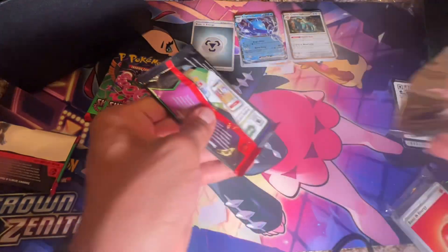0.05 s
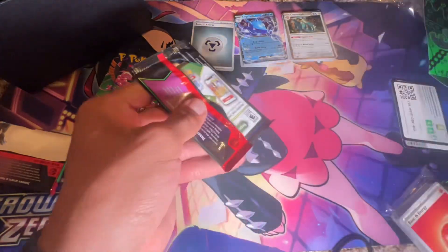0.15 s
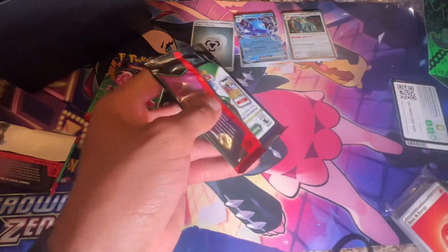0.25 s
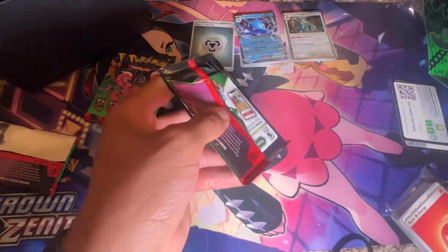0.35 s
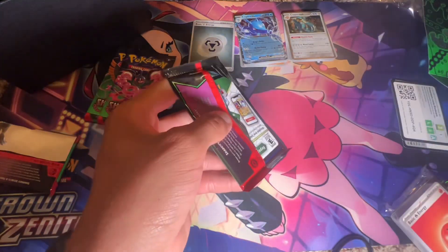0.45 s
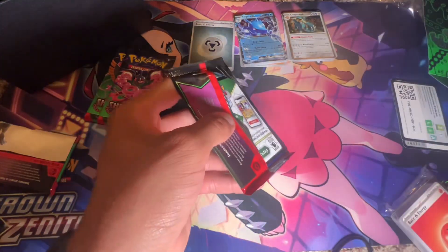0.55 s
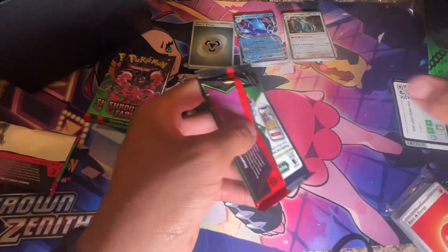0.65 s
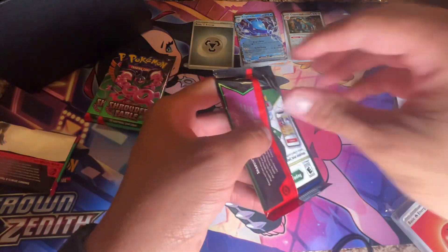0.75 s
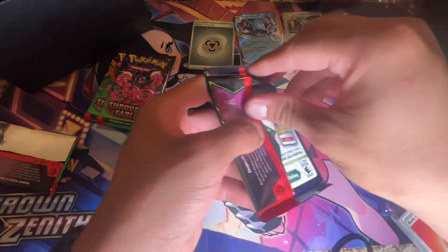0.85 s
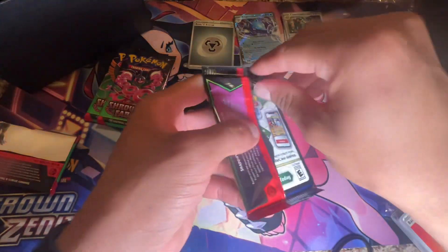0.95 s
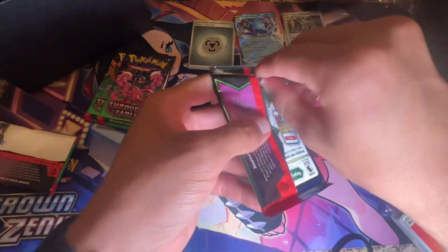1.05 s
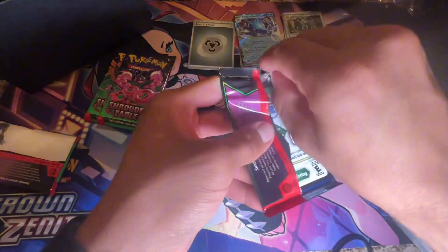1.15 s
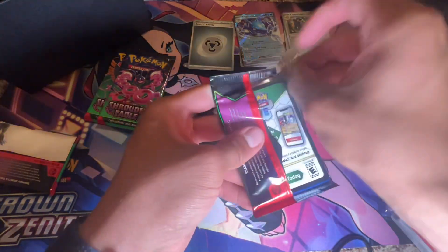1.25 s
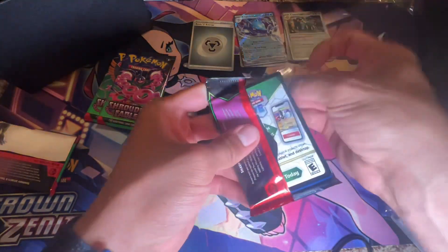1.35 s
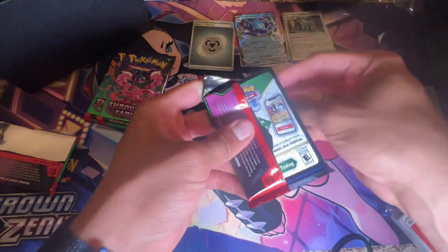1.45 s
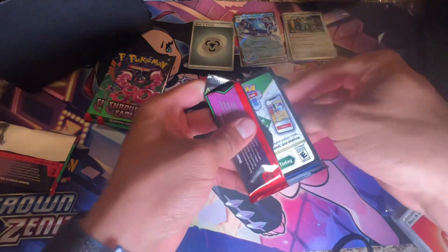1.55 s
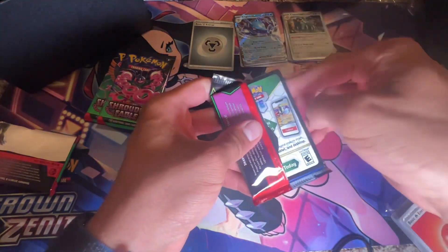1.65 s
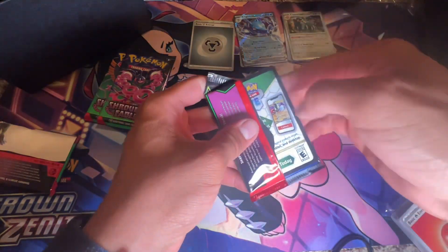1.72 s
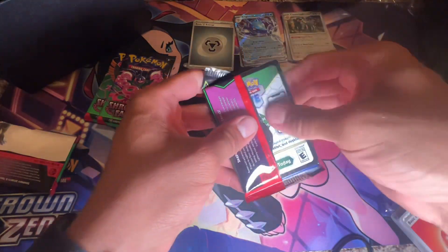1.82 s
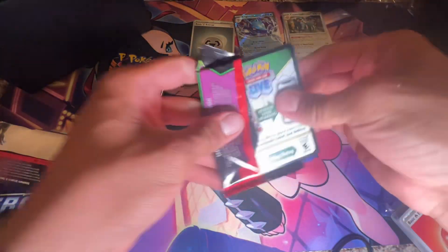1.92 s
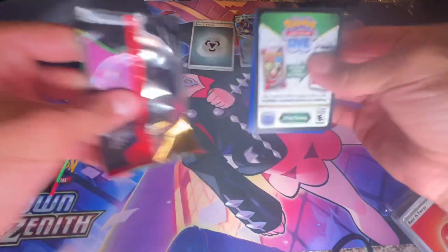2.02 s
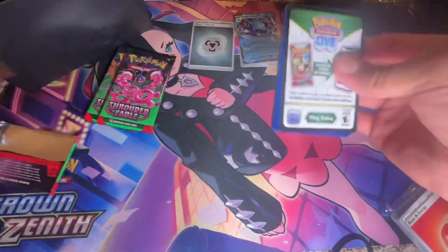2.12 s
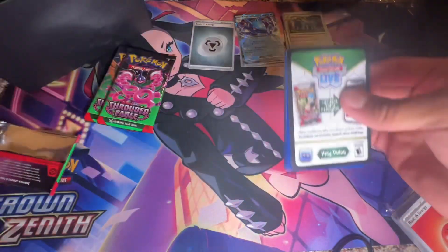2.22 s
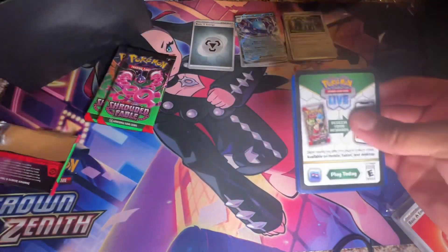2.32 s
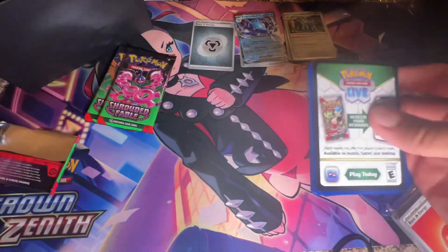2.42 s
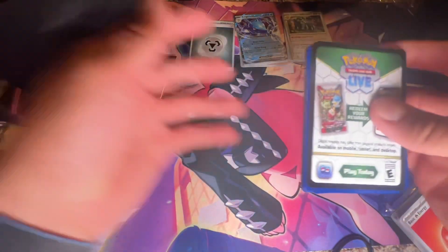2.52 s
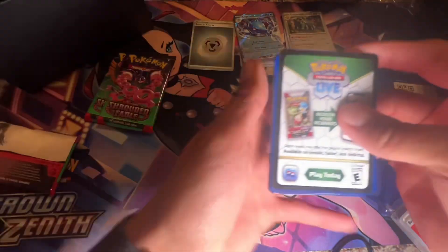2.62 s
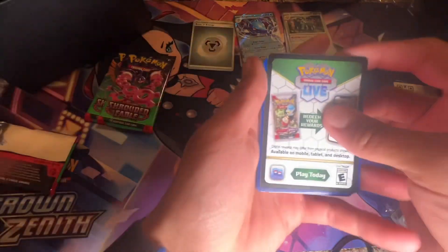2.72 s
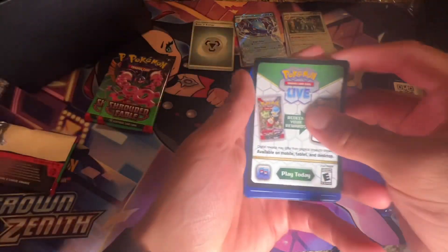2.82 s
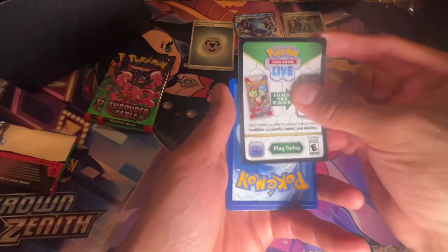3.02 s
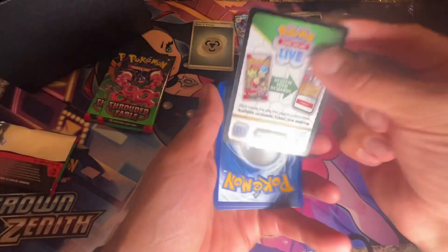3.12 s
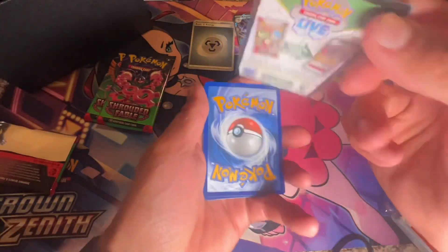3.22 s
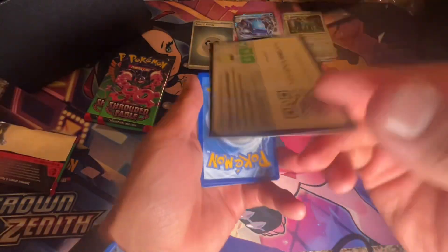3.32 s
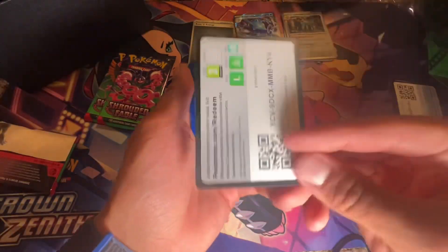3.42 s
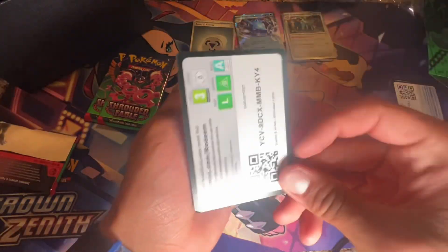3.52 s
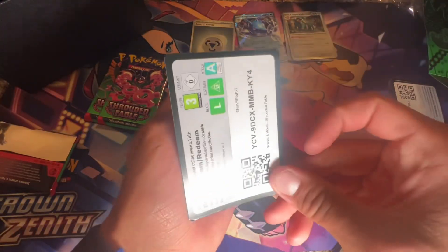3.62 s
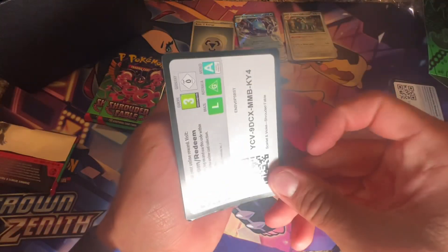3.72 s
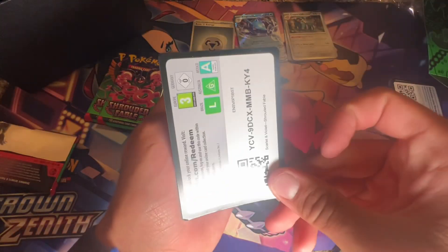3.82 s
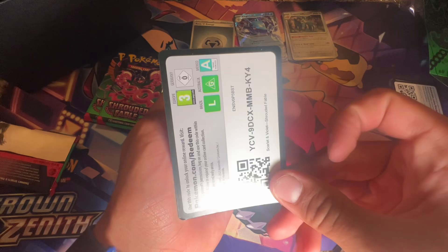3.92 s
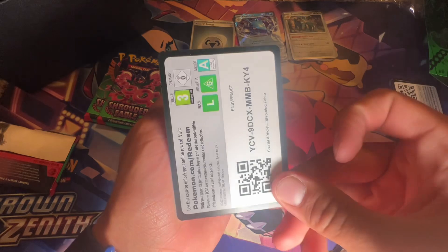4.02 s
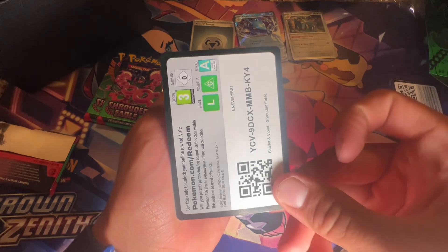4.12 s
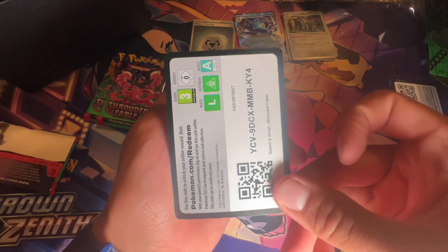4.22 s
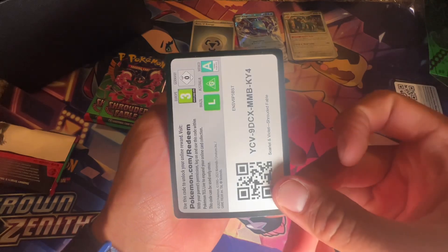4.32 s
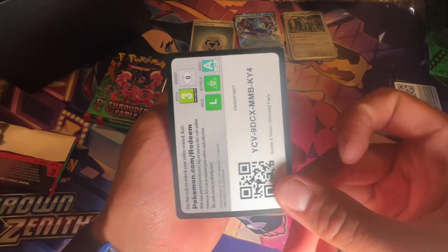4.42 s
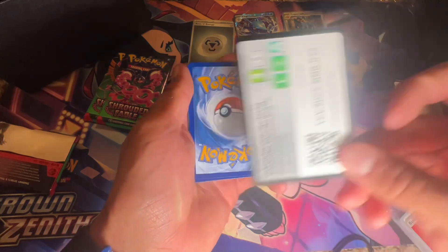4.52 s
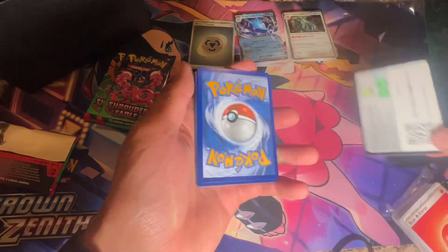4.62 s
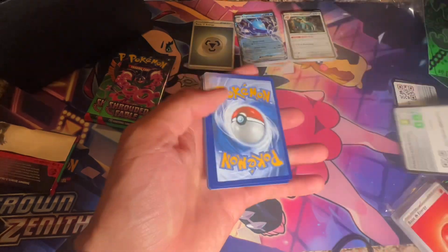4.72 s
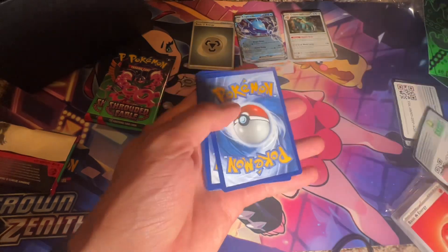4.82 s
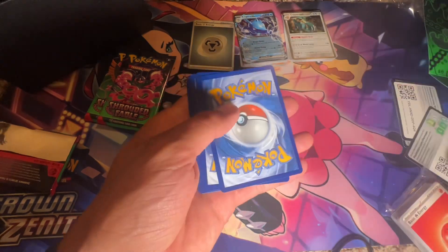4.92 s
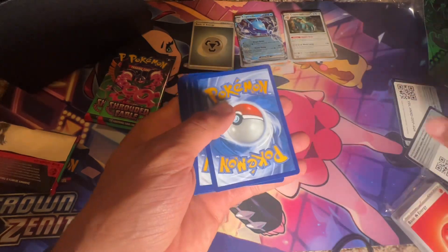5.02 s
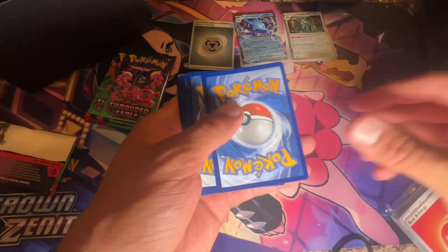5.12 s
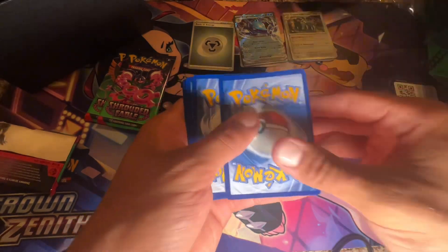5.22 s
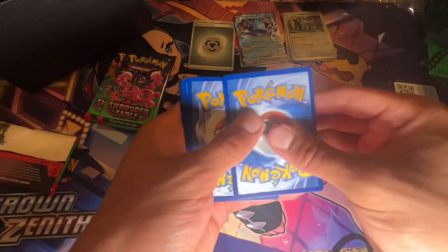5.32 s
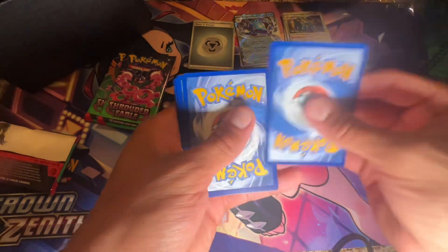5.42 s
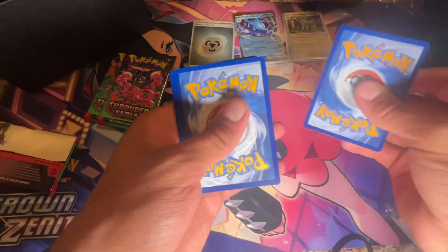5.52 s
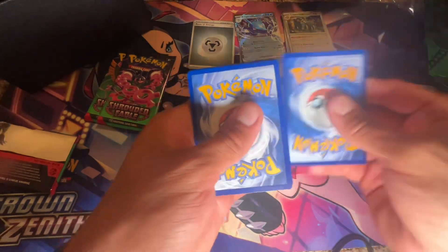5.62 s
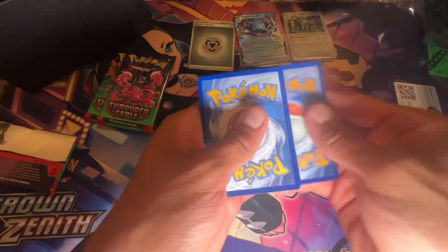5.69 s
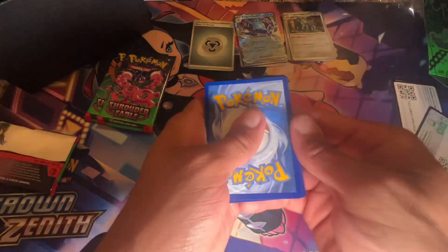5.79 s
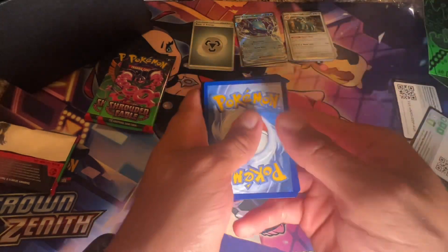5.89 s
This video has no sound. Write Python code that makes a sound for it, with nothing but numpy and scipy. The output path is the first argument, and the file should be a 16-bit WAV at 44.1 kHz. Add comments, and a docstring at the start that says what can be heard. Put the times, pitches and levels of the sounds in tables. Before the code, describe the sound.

Close stereo pickup over a padded desk in a small room: light foil ticks, then a loud bright burst of tearing and dense crinkling just after one second, continuing until the wrapper comes off around two. Quieter faint card slides follow, then clustered edge taps before five seconds and a crisp card flick near five and a half. Low rumble, soft hum and faint hiss lie underneath.

```python
"""A foil card pack is gripped, torn open and pulled off its cards, close to a camera above a padded desk.
The foil is sharp bursts of noise that ring, many tiny slips that crinkle, and dense slips that scrape.
Then cards slide (rough noise), click (short bursts), flick (a push into card tones) and bump (sinking tones).
A small room answers, over a low rumble, mains hum and a faint hiss mostly on the left."""
import sys
import numpy as np
from scipy import signal
from scipy.fft import rfft, irfft, next_fast_len
from scipy.io import wavfile
from scipy.ndimage import uniform_filter1d, map_coordinates

SR = 44100
rng = np.random.default_rng(int(sys.argv[2]) if len(sys.argv) > 2 else 0)


def wav_out(sig):
    """Save sig, one row per channel (or a flat mono array), as 16-bit PCM at SR to the path in sys.argv[1]."""
    wavfile.write(sys.argv[1], SR, np.round(np.clip(np.atleast_2d(sig).T, -1, 1) * 32767).astype(np.int16))


N = 262395  # length [samples]
LEAD_S = .005  # time a sheet takes to give way before it jumps [s]

# the fingers work the wrapper: (start [s], stop [s], effort [dB])
FINGER_GRIPS = [(0.0, 0, -48), (0.912, 0.994, -52), (1.096, 1.295, -54), (1.353, 1.513, -45),
                (1.8, 1.993, -50.5), (2.06, 2.139, -53), (2.326, 2.47, -57)]
# tone colour of rubbing card: (frequency [Hz], level [dB])
PAPER_COLOUR = [(180, 0.5), (300, -5), (617, -3.5), (987, -0.5), (1270, -4), (2520, -0.5), (4390, -3.5),
                (6560, 0.5), (9490, -9.5), (11800, -16), (15700, -32), (16500, -14)]


def wrapper():
    """Single snaps of the foil, each ringing in its own facet and thrown in its own direction."""
    # the foil buckles or rips; level is before the lift below, body, sparkle and left-right before the plain values:
    # (time [s], level [dB], body [dB], sparkle [dB], left-right [dB], facet pitch [Hz])
    foil_snaps = [(0.114, -25, -24, -42, -1.5, 1430), (0.135, -27.5, -23, -19, 1, 4000),
                  (0.184, -26.5, -23, -15, 1.5, 5900), (0.222, -31.5, -16, -34, 7, 1230),
                  (0.243, -33.5, -17, -28, 5, 4290), (0.277, -22, -23.5, -16, 6, 3300),
                  (0.347, -25.5, -25, -22, 8, 8650), (0.368, -24.5, -21.5, -34, 4, 2200),
                  (0.47, -25.5, -13.5, -19.5, 2.5, 1560), (0.552, -43.5, -18, -28, 3.5, 5210),
                  (0.797, -33, -14.5, -22, 5.5, 3530), (0.912, -22.5, -17.5, -22, 0.5, 1530),
                  (0.943, -26, -10, -25, 4.5, 1010), (0.985, -24, -28, -16.5, 5, 4710),
                  (1.1, -27.5, -15, -17.5, 2, 1060), (1.12, -17.5, -28, -8, 8, 7040),
                  (1.133, -17.5, -21.5, -4.5, 6, 6860), (1.157, -16.5, -18.5, -10.5, 6.5, 1640),
                  (1.179, -5, -23, -8.5, 7, 6370), (1.182, -8, -22, -17, 6.5, 6250),
                  (1.213, -8.5, -16, -19, 12, 5950), (1.22, -13, -16, -20, 2, 1040),
                  (1.235, -11, -18.5, -10.5, 2.5, 8520), (1.282, -14, -19, -15.5, 4.5, 5600),
                  (1.31, -18.5, -17.5, -14, 5.5, 1070), (1.339, -17, -22, -25, 0.5, 3430),
                  (1.381, -14.5, -17, -13.5, 3, 6610), (1.408, -19, -16, -15, 2, 1010),
                  (1.432, -20, -18, -13, 3, 2040), (1.456, -25, -13, -7, 5, 5620),
                  (1.49, -14, -22.5, -15.5, 0.5, 6000), (1.58, -24, -9.5, -23, 5.5, 1250),
                  (1.608, -26, -26, -5, 4, 6700), (1.655, -22.5, -28.5, -13.5, 5.5, 6140),
                  (1.762, -23, -26, -18, 5, 6200), (1.802, -21.5, -21.5, -27, 2.0, 2620),
                  (1.864, -19, -23, -16, 3, 6200), (1.874, -18.5, -28, -11, 3, 4680),
                  (1.926, -17.5, -19, -16, 9, 5900), (1.933, -16.5, -20.5, -8, 0, 1620),
                  (1.961, -18, -21, -9, 6, 3170), (1.992, -22, -28, -17, 6.5, 6500),
                  (2.107, -19, -24, -22, 13.5, 5100), (2.123, -31, -20, -26, 4.5, 6550),
                  (2.198, -34, -30, -28, 9.5, 6500), (2.309, -24.5, -29, -18, 6.5, 4300),
                  (2.321, -25, -18, -28, 8, 5000), (2.369, -26, -35, -35, 5, 3670),
                  (2.462, -41, -25, -27, 10, 6610)]
    plain_body_db, plain_sparkle_db, plain_pan_db = -16.5, -19.5, 6  # a snap in the wrapper's own colour
    lift_db, delay_s = 19.5, .0014
    out = np.zeros((2, N))
    for s, db, body_db, sparkle_db, pan_db, facet_hz in foil_snaps:
        sound = snap(body_db - plain_body_db, sparkle_db - plain_sparkle_db, pan_db - plain_pan_db, facet_hz)
        add(out, s + delay_s - LEAD_S, amp(db + lift_db) * sound)
    return out


def small_snaps():
    """While the fingers work, small facets flip at random, louder under a firmer grip."""
    snaps_per_s, over_effort_db, spread_db = 22, 28, 6
    out = np.zeros((2, N))
    for start, stop, effort_db in FINGER_GRIPS:
        count = round((stop - start) * snaps_per_s)
        for when, size, side, facet in rng.uniform(-1, 1, (count, 4)):
            sound = snap(body_db=3.5, sparkle_db=-1, pan_db=2.8 * side, facet_hz=4000 * 2 ** facet)
            s = start + (stop - start) * (when + 1) / 2
            add(out, s, amp(effort_db + over_effort_db + spread_db * size) * sound)
    return out


def snap(body_db, sparkle_db, pan_db, facet_hz):
    """One facet of the foil flips over and rings."""
    def colour(hz):
        ring_db = 7 * resonance(hz, facet_hz, octaves=0.19)
        return foil_colour(hz) + shelves(hz, body_db, sparkle_db) + ring_db + aimed(hz, pan_db)

    return crack(colour, t60=0.013, rise=0.00036, echo_s=0.0079, echo_db=-14, room_db=-7.5)


def crinkle():
    """Countless tiny creases of several sizes follow the fingers' effort; the finest need the most force."""
    # families of creases, levels before the lift below:
    # (centre [Hz], level at the firmest grip [dB], growth [dB per dB of effort])
    crease_families = [(1153, -3, 1.12), (3304, -2, 2.5), (6005, -2, 1), (12100, -7.5, 3.6)]
    lift_db = 0.5
    out, effort_db = np.zeros((2, N)), effort()
    firm_db = effort_db.max()
    for centre_hz, db, growth in crease_families:
        creases = grains(200, 4.5, .4)
        colour = lambda hz: foil_colour(hz) + aimed(hz, 1.3) + 24 * resonance(hz, centre_hz, octaves=2.86)
        level_db = firm_db + db + lift_db + growth * (effort_db - firm_db)
        out += amp(level_db) * unit(coloured(creases, colour))
    return out


def effort():
    """The fingers' force on the wrapper in dB: firm grips over a light hold that ends with the last of them."""
    attack, release = 199.5, 95  # [dB per s]; the foil keeps settling after each grip
    holding_db = -73
    grips = [db + gesture(start, stop, attack, 0, release) for start, stop, db in FINGER_GRIPS]
    hold = holding_db + gesture(0, FINGER_GRIPS[-1][1], 0, 0, release)
    return np.max(grips + [hold], axis=0)


def scrapes():
    """The seam rips, the stack leaves its sleeve, a card skids: dense slips that swell and fade."""
    # surfaces scrape past each other; a scrape too early to fit its rise starts at 0 s and peaks later:
    # (peak time [s], rise [s], fall [s], level [dB], body [dB], sparkle [dB], left-right [dB])
    scrape_list = [(0.003, 0.0079, .025, -37, -13, -10, 6.5), (0.119, 0.025, 0.082, -53.5, 8, 3, -6),
                   (0.901, 0.029, 0.013, -46.5, -9, 10.5, -3), (1.179, 0.005, 0.013, -21.5, 3, -1, 12),
                   (1.226, 0.012, 0.014, -27, 17, -2.5, 7), (1.688, 0.03, 0.071, -43, -7, -2, -5),
                   (1.938, 0.027, 0.016, -24, 4.5, 5.5, 2.5), (3.116, 0.029, 0.015, -49, -15, 5.5, 5),
                   (3.176, .013, .008, -44.5, -31, 1, 7), (4.693, 0.0086, .024, -34, -14, 7, -2),
                   (5.403, 0.013, .019, -40.5, -3, 6.5, -3)]
    out, t = np.zeros((2, N)), np.arange(SR // 3) / SR
    slips = grains(1100, 3.5, .4)
    for s, rise, fall, db, body_db, sparkle_db, pan_db in scrape_list:
        u = t - t.mean()
        swell = np.exp(-np.abs(u / np.where(u < 0, rise, fall)) ** 1.3)
        colour = lambda hz: foil_colour(hz) + aimed(hz, pan_db) + shelves(hz, body_db, sparkle_db, body_hz=1316)
        first = rng.integers(N - len(t))
        rasp = unit(coloured(slips[:, first:first + len(t)], colour))
        add(out, s - t.mean(), amp(db) * swell * rasp)
    return out


def foil_colour(hz):
    """The wrapper's spectrum at each microphone, in dB."""
    # tone colour of the foil: (frequency [Hz], level [dB])
    foil = [(120, -17), (200, -8.5), (503, -5), (1090, 0), (1390, -1.5), (1550, 0), (1800, -3),
            (3500, -4.5), (3910, -5.5), (6680, -3.5), (10000, -12), (12100, -11.5), (14000, -32.5),
            (15600, -14), (16500, -37)]
    # how the foil leans to one side: (frequency [Hz], left-right [dB])
    foil_side = [(200, 0), (700, 2.5), (2300, -1.5), (4400, 9.5), (7500, 6.5), (10000, -1), (15000, -0.5)]
    return along(foil, hz) + panned(along(foil_side, hz))


def slides():
    """Card faces hiss over each other, catching and letting go."""
    # a card is drawn over the stack: (start [s], stop [s], final level [dB], sparkle [dB])
    card_slides = [(2.503, 2.808, -60, 1), (2.896, 3.169, -53.5, 10), (3.4, 3.526, -65, 4),
                   (4.4, 4.583, -65.5, -0.5), (4.718, 4.76, -49, -3), (5.292, 5.386, -48, 18),
                   (5.63, 5.711, -48.5, 15)]
    attack, build, release = 202, 21, 178  # [dB per s]; a card gathers speed, then stops
    out = np.zeros((2, N))
    slips = grains(700, 2.8, .8) * amp(1.8 * wobble(55))
    for start, stop, db, sparkle_db in card_slides:
        speed_db = gesture(start, stop, attack, build, release)
        colour = lambda hz: (along(PAPER_COLOUR, hz) + shelves(hz, 0, sparkle_db, sparkle_hz=10160)
                             + aimed(hz, 2.3))
        out += amp(db + speed_db) * unit(coloured(slips, colour))
    return out


def clicks():
    """Card edges slip off each other and tap the stack."""
    # level is before the lift below, body and sparkle before the plain values:
    # (time [s], level [dB], body [dB], sparkle [dB], left-right [dB])
    edge_clicks = [(2.759, -38, -19.5, -55, 8), (2.987, -41, -19.5, -37, 7), (3.271, -39, -19, -17, 4.0),
                   (3.364, -47.5, -10, -25, 9), (3.528, -46, -15, -28, 2.5), (4.401, -47.5, -7, -26, 10),
                   (4.524, -35.5, -11, -21, -3.5), (4.535, -40, -7, -13, -2),
                   (4.687, -25.5, -23.5, -12, -3), (4.703, -17.5, -42, -16, -0.5),
                   (4.776, -34, -20, -16, -1), (4.82, -16.5, -25, -18.5, 1), (4.844, -34, -27, -39, 10.5),
                   (5.224, -43.5, -4, -30, 6), (5.632, -32.5, -16, -21, 0.5), (5.784, -35, -19, -32.5, 5.5),
                   (5.923, -41, -19, -18.5, 4)]
    plain_body_db, plain_sparkle_db = -19.5, -22  # a click in plain card colour
    lift_db, delay_s = 21.0, 0.00053
    out = np.zeros((2, N))
    for s, db, body_db, sparkle_db, pan_db in edge_clicks:
        colour = lambda hz: (along(PAPER_COLOUR, hz) + aimed(hz, pan_db)
                             + shelves(hz, body_db - plain_body_db, sparkle_db - plain_sparkle_db))
        sound = crack(colour, t60=0.015, rise=0.0013, echo_s=0.0053, echo_db=-12.0, room_db=-3.5)
        add(out, s + delay_s - LEAD_S, amp(db + lift_db) * sound)
    return out


def flicks():
    """A released card slaps back: one sharp push into its broad, heavily damped bending modes."""
    # a bent card springs off the stack: (time [s], level [dB])
    card_flicks = [(5.4153, 1.5), (5.785, -22.5)]
    # tone colour of the flicked card: (frequency [Hz], level [dB])
    card = [(120, -15), (210, -5), (520, -9), (740, -6.5), (1015, 3), (1300, -8.5), (1700, -8.5),
            (2050, -16), (2290, 0), (2600, -12.5), (3300, -24), (3780, -14), (4700, -30), (6300, -18),
            (9000, -39), (16000, -40)]
    out = np.zeros((2, N))
    for s, db in card_flicks:
        push = amp(-7.5) * ports(walls())
        push[:, 0] += 1  # the push itself, ahead of the room's answer
        slap = coloured(push, lambda hz: along(card, hz))
        add(out, s, amp(db) * slap / np.linalg.norm(slap))
    return out


def bumps():
    """Bending waves in card arrive high first, so each soft bump sinks in pitch."""
    # soft bumps of the pack and the fingers: (time [s], level [dB], final pitch [Hz], time to fall 60 dB [s])
    soft_bumps = [(0.167, -39, 311, 0.026), (1.957, -13.5, 200, 0.011), (2.001, -27, 205, 0.024),
                  (3.055, -30.5, 424, 0.011), (3.299, -42.5, 270, 0.067), (3.371, -41.5, 370, 0.065),
                  (4.41, -42, 89, 0.25), (4.528, -34, 166, 0.047), (4.546, -30.5, 86.4, 0.045),
                  (4.694, -36, 470, 0.027), (5.417, -28, 190, 0.023), (5.646, -35.5, 170, 0.022),
                  (5.786, -28.5, 490, 0.016), (5.794, -29, 188, 0.016)]
    pan_db = 6  # left-right
    out, t = np.zeros((2, N)), np.arange(SR // 6) / SR
    for s, db, hz, t60 in soft_bumps:
        phase = 2 * np.pi * np.cumsum(hz * (1 + 1.2 * np.exp(-t / 0.0011))) / SR
        low_pass = lambda f: -10 * np.log10(1 + (f / (1.5 * hz)) ** 6)
        flutter = unit(coloured(ports(rng.standard_normal((2, len(t)))), low_pass))
        thud = np.sin(phase) + .3 * flutter
        onset = 1 - np.exp(-t / 0.0024)
        add(out, s, amp(db + panned(pan_db) - 60 * t / t60) * onset * thud)
    return out


def room(x):
    """The walls' answer changes as the hands move: a fresh one for each third of a second."""
    out, step = np.zeros((2, N)), SR // 3
    for start in range(0, N, step):
        answer = signal.fftconvolve(x[:, start:start + step], ports(walls()), axes=1)
        add(out, start / SR, answer)
    return out


def walls():
    """The room's answer to one impulse: noise, strongest early, that fades at its own pace in each band."""
    # how long the room rings: (frequency [Hz], time to fall 60 dB [s])
    ring_times = [(150, 0.073), (1000, 0.18), (5000, 0.25), (9000, 0.17), (15000, 0.16)]
    hz, t, z = signal.stft(rng.standard_normal((2, SR // 4)), SR, nperseg=256)
    absorbed_db = shelves(hz, 0, -7.5)[:, None]  # the walls soak up treble
    fade_db = -60 * t / along(ring_times, hz)[:, None]
    tail = signal.istft(z * amp(absorbed_db + fade_db), SR, nperseg=256)[1]
    t = np.arange(tail.shape[1]) / SR
    tail = tail * (1 - np.exp(-t / 0.0036)) * (1 + 1.9 * np.exp(-t / .018))
    return amp(-1) * tail / np.linalg.norm(tail)


def background():
    """Low rumble that rises with the arms' movement, a wavering hum, and hiss mostly on the left."""
    # the arms move and jog the desk: (time [s], added rumble level [dB])
    arm_moves = [(0.17, -54), (1.22, -63), (1.95, -42), (3.349, -57), (4.54, -65), (5.77, -54.5)]
    # tone colour of the rumble: (frequency [Hz], level [dB])
    rumble_colour = [(13, -72), (22, -28), (40, -13.5), (60, 4.5), (87, -2), (219, -8), (251, -19),
                     (370, -20), (474, -32.5), (600, -30), (780, -52.5), (1320, -120)]
    # tone colour of the hiss: (frequency [Hz], level [dB])
    hiss_colour = [(300, -18.5), (750, -10), (1050, -7), (1300, -7.5), (1600, 2), (1850, -2.5),
                   (2200, -3.5), (2900, -30), (4500, -25), (6000, -14), (6800, -18), (7450, -5),
                   (8100, -21), (9300, -18), (10500, -51)]
    hiss_side = [(300, -22.5), (700, 3), (1400, 15.0)]  # (frequency [Hz], left-right [dB])
    noise = lambda: rng.standard_normal((2, N))

    at_rest = amp(-57 + 1.5 * wobble(5))
    handling = at_rest + sum(amp(db) * hump(s, half_s=0.039) for s, db in arm_moves)
    rumble = handling * unit(coloured(ports(noise()), lambda hz: along(rumble_colour, hz)))

    hum = amp(-62.5 + 2.1 * wobble(4.5)) * np.sin(2 * np.pi * 60 * np.arange(N) / SR)

    hiss_db = -64 + 5 * hump(2.4, half_s=0.58) + 0.86 * wobble(9)  # swells once, slowly
    colour = lambda hz: along(hiss_colour, hz) + panned(along(hiss_side, hz))
    hiss = amp(hiss_db) * unit(coloured(noise(), colour))
    return rumble + hum + hiss + amp(-99) * noise()


def crack(colour_db, t60, rise, echo_s, echo_db, room_db):
    """A thin sheet gives way and jumps, LEAD_S in; the desk repeats the burst and the walls answer."""
    tail = walls()
    t = np.arange(tail.shape[1]) / SR - LEAD_S
    shape = lambda u: np.exp(np.minimum(u, 0) / rise) * amp(-60 * np.maximum(u, 0) / t60)
    burst = rng.standard_normal(tail.shape) * (shape(t) + amp(echo_db) * shape(t - echo_s))
    burst_in_room = burst / np.linalg.norm(burst) + amp(room_db) * tail
    sound = coloured(ports(burst_in_room), colour_db)
    return sound / np.linalg.norm(sound)


def grains(rate, spread_db, smooth):
    """Random tiny slips of unequal size, each about a millisecond long, on a bed of smooth friction."""
    sizes = amp(spread_db * np.minimum(rng.exponential(size=N), 3))
    slips = (rng.random(N) < rate / SR) * sizes  # rate is in slips per second
    t = np.arange(SR // 200) / SR
    power = np.abs(signal.fftconvolve(slips ** 2, t * np.exp(-t / .0004))[:N])
    return ports(rng.standard_normal((2, N)) * np.sqrt(power / power.mean() + smooth ** 2))


def flexed(x, depth_db):
    """The sheets keep changing shape, so their resonances come and go in small patches."""
    z = signal.stft(x, nperseg=256)[2]
    field = rng.standard_normal(z.shape[1:])
    field = uniform_filter1d(field, size=2, axis=0)  # blurred over frequency
    field = uniform_filter1d(field, size=7, axis=1)  # blurred over time
    gain = unit(amp(depth_db * np.clip(unit(field), -2, 2)))
    return signal.istft(z * gain, nperseg=256)[1][:, :N]


def gesture(start, stop, attack, build, release):
    """Envelope in dB of one hand action, 0 at its stop if build is used; slopes are in dB per second."""
    t = np.arange(N) / SR
    before, during, after = np.maximum(start - t, 0), np.maximum(stop - t, 0), np.maximum(t - stop, 0)
    return -attack * before - build * during - release * after


def hump(s, half_s):
    """A smooth swell, 1 at its centre."""
    return np.exp(-((np.arange(N) / SR - s) / half_s) ** 2)


def wobble(rate):
    """A smooth random curve, rate knots a second."""
    knots = rng.standard_normal(int(N * rate / SR) + 4)
    return map_coordinates(knots, [np.arange(N) * rate / SR])


def resonance(hz, centre_hz, octaves):
    """A bell on the log-frequency axis, 1 at its centre."""
    return np.exp(-(np.log2((hz + 1) / centre_hz) / octaves) ** 2)


def shelves(hz, body_db, sparkle_db, body_hz=1900, sparkle_hz=9000):
    """Large facets add body (the lows), tiny ones sparkle (the highs)."""
    return body_db / (1 + (hz / body_hz) ** 4) + sparkle_db / (1 + (sparkle_hz / (hz + 1)) ** 8)


def aimed(hz, pan_db):
    """Left-right gains in dB; the highest treble stays centred."""
    return panned(pan_db / (1 + (hz / 9500) ** 8))


def panned(db):
    """Gains in dB of the left and right channel."""
    return np.array([[.5], [-.5]]) * db


def ports(pair):
    """Two unrelated signals become the partly alike signals of the two microphones."""
    # how alike left and right are: (frequency [Hz], likeness [-1 to 1])
    alike = [(60, 1), (280, 0.43), (700, 0.096), (3000, -0.31), (7000, -0.15), (10000, -0.42),
             (12500, 0.43)]
    n = pair.shape[-1]
    m = next_fast_len(n)
    likeness = along(alike, np.fft.rfftfreq(m, 1 / SR))
    turn = np.arccos(np.clip(likeness, -.98, .98)) / 2
    mid, side = irfft(rfft(pair, m) * [np.cos(turn), np.sin(turn)], m)[:, :n]
    return np.array([mid + side, mid - side])


def coloured(x, colour_db):
    """Causal filter with a gain in dB that is a function of frequency."""
    n = x.shape[-1]
    m = 2 * next_fast_len(n // 2 + 1024)
    hz = np.fft.rfftfreq(m, 1 / SR)
    # folding the cepstrum makes the filter respond only after its input
    cepstrum = irfft(np.log(np.maximum(amp(colour_db(hz)), 1e-6)), m)
    fold = np.r_[1, np.full(m // 2 - 1, 2), 1, np.zeros(m // 2 - 1)]
    return irfft(rfft(x, m) * np.exp(rfft(cepstrum * fold)), m)[..., :n]


def along(points, hz):
    """Read a curve of (frequency [Hz], value) points on a log-frequency axis."""
    f, v = np.transpose(points)
    return np.interp(np.log(hz + 1), np.log(f + 1), v)


def amp(db):
    """Decibels to a plain gain."""
    return 10 ** (np.asarray(db) / 20)


def unit(x):
    """Scale to an average (RMS) size of 1."""
    return x / np.sqrt(np.mean(x ** 2) + 1e-20)


def add(track, s, sound):
    """Lay a sound into a track at a time in seconds, at 0 if the time is negative."""
    part = track[:, max(round(s * SR), 0):][:, :sound.shape[-1]]
    part += sound[..., :part.shape[-1]]


def scene():
    """Sharp snaps and clicks over the rubbing sounds, their room and the background."""
    snapping = flexed(wrapper() + clicks() + small_snaps(), depth_db=4.0) + flicks()
    rubbing = flexed(crinkle() + scrapes() + slides(), depth_db=4) + bumps()
    return snapping + rubbing + amp(-8.5) * room(rubbing) + background()


def record(dry):
    """The camera rounds off the sharpest peaks and cuts steeply above its band limit."""
    top_hz = 16300
    rounded = dry / (1 + np.abs(dry / .75) ** 4) ** (1 / 4)
    m = next_fast_len(N + SR // 4)
    band = 1 / (1 + (np.fft.rfftfreq(m, 1 / SR) / top_hz) ** 90)
    return irfft(rfft(rounded, m) * band, m)[:, :N]


dry = scene()
out = record(dry)
wav_out(out)
```